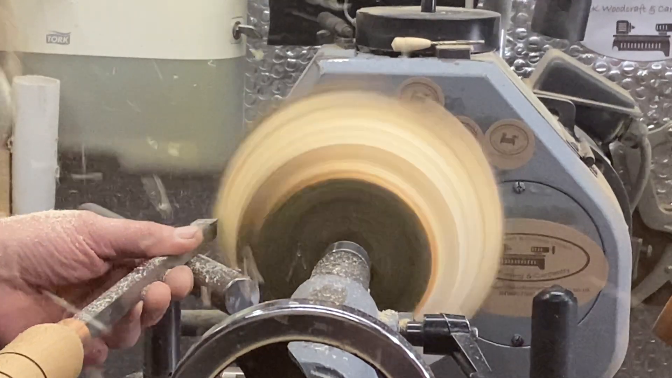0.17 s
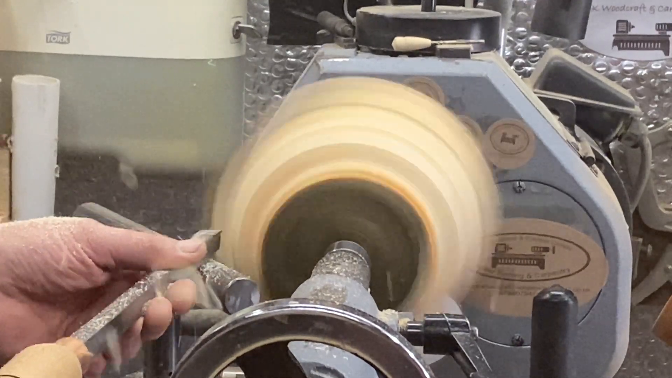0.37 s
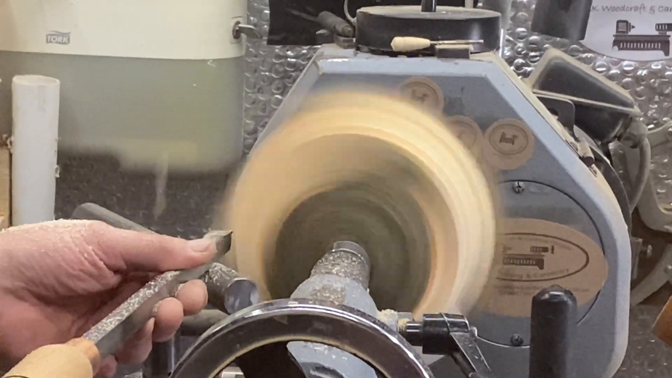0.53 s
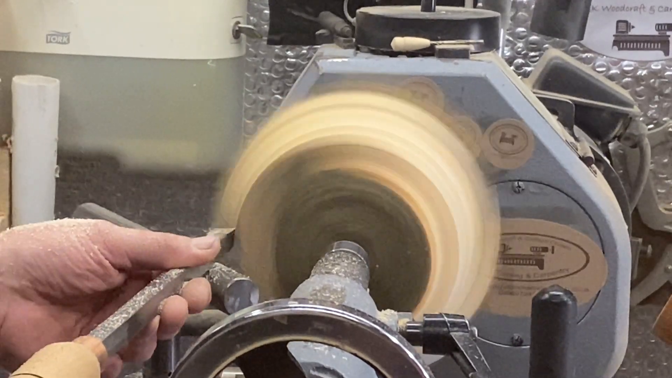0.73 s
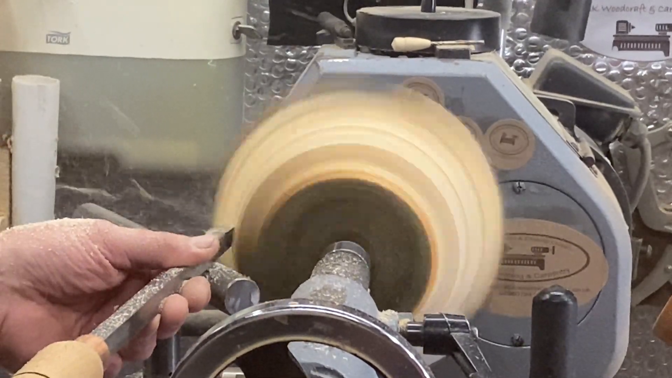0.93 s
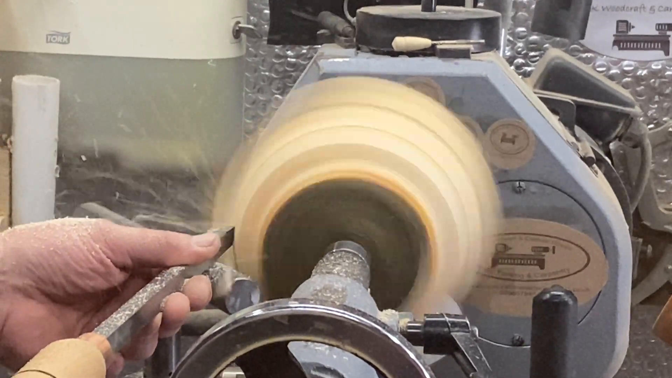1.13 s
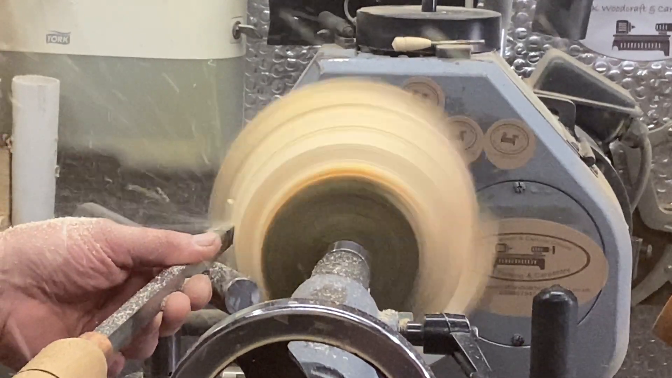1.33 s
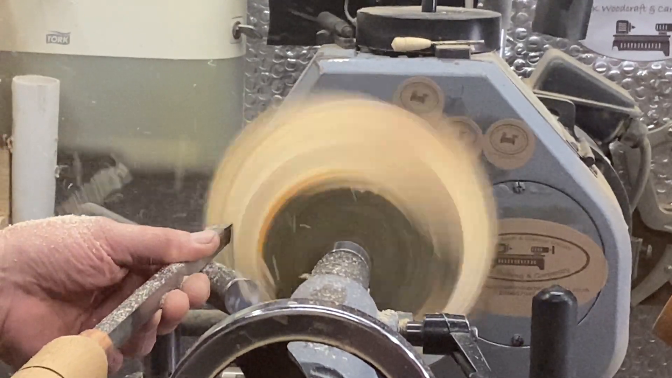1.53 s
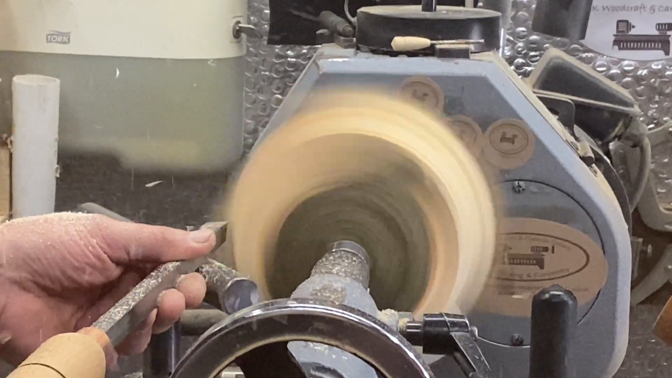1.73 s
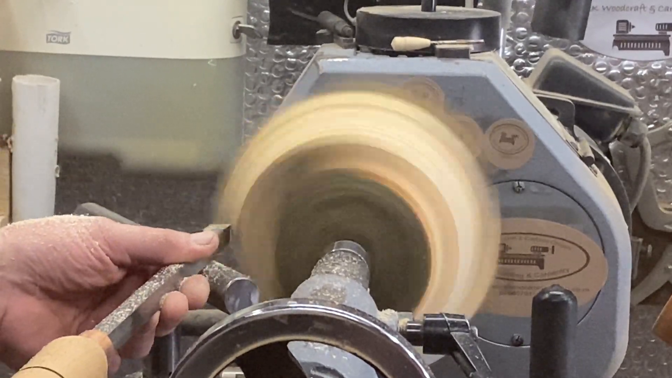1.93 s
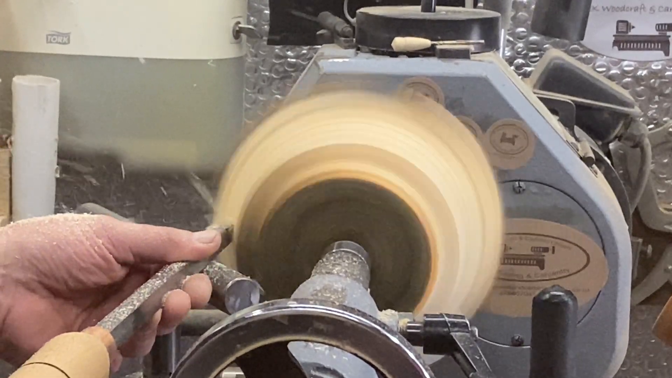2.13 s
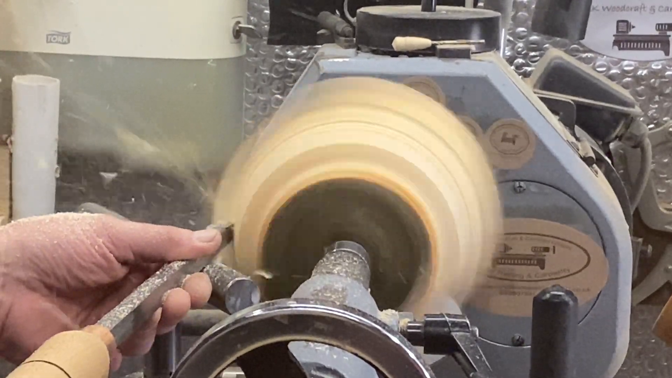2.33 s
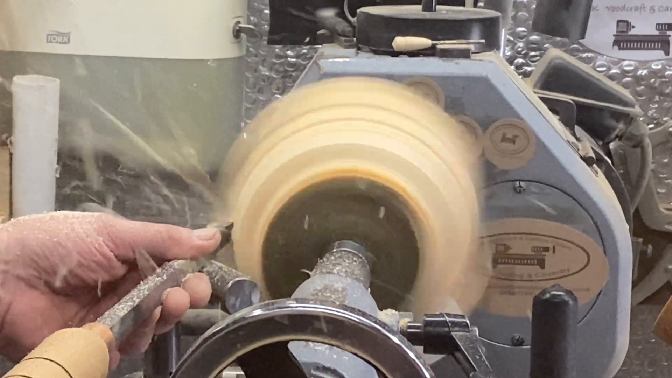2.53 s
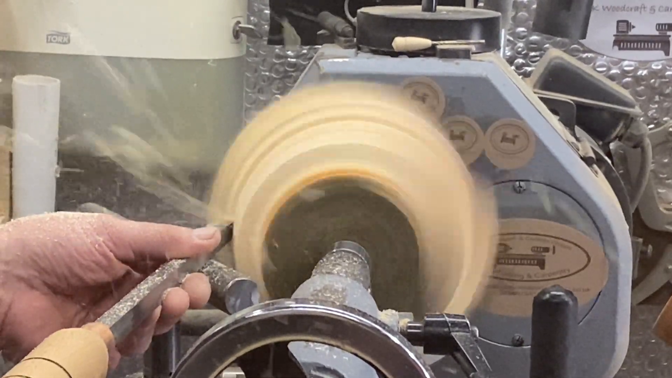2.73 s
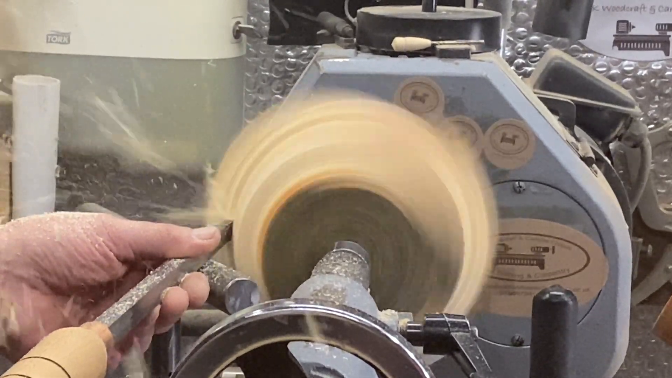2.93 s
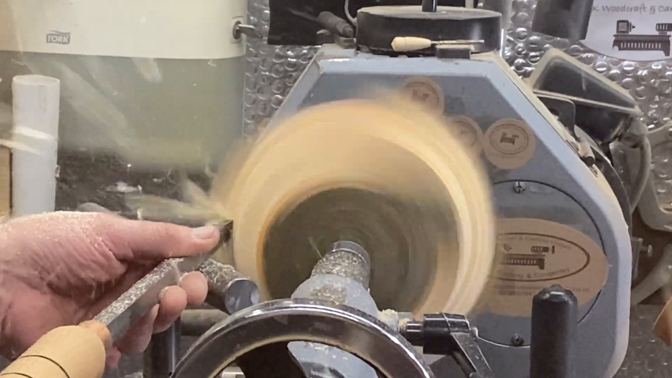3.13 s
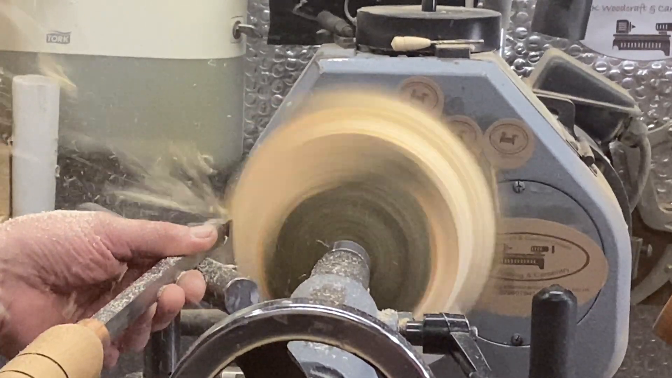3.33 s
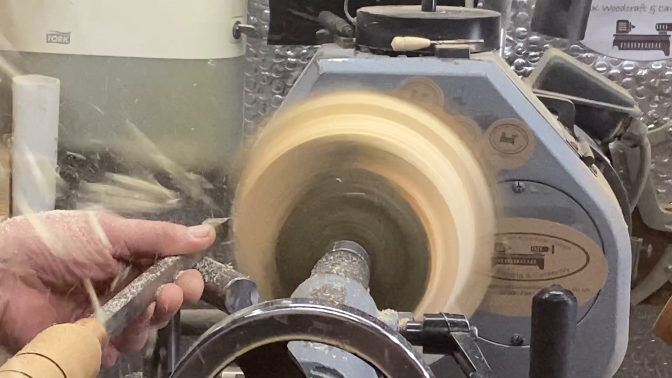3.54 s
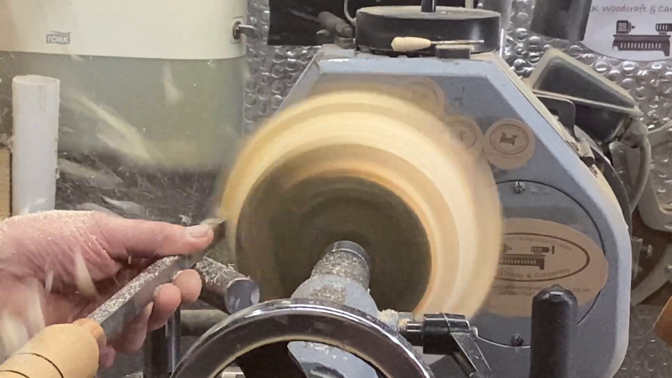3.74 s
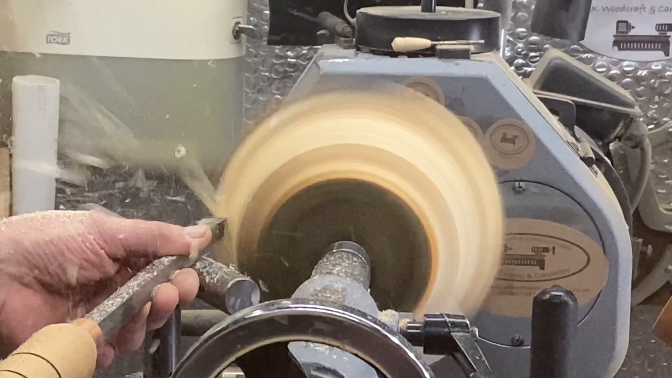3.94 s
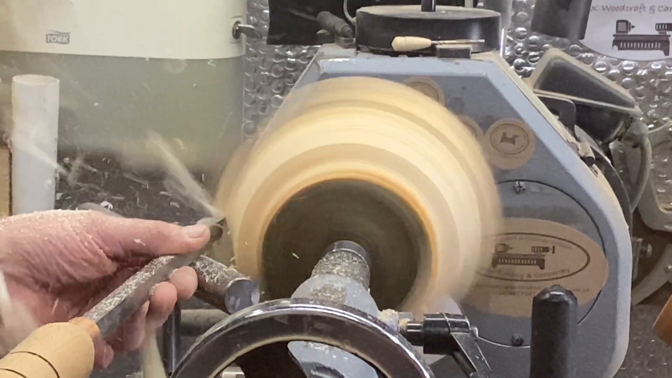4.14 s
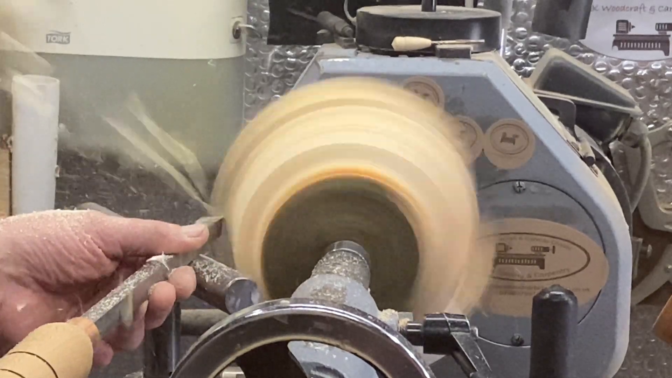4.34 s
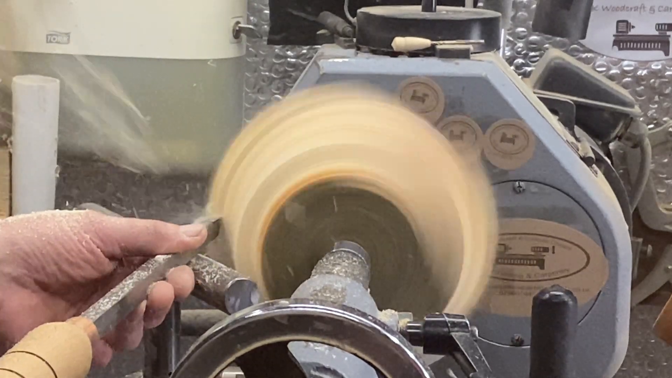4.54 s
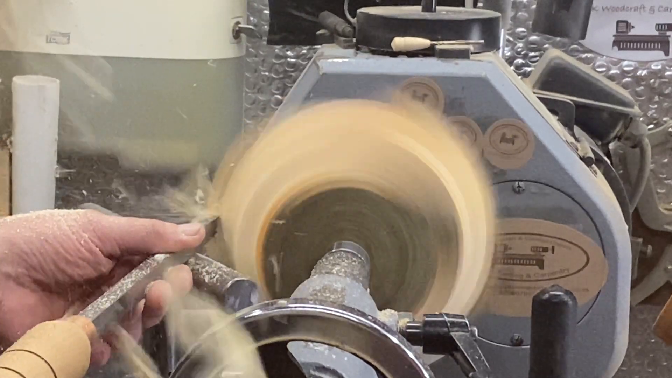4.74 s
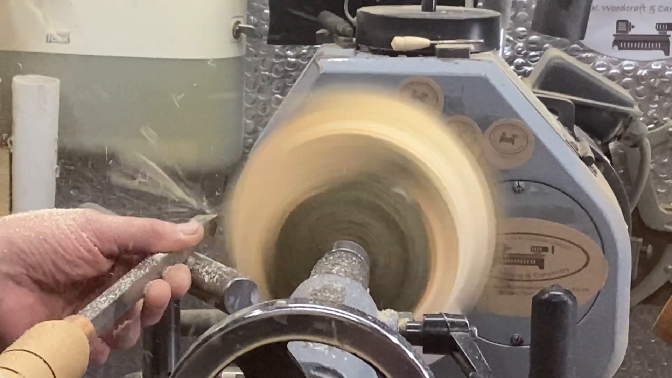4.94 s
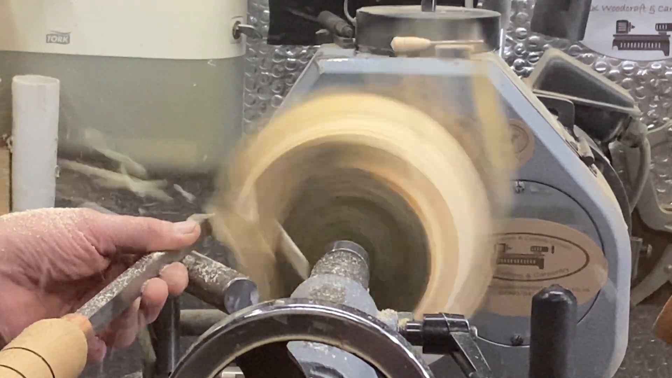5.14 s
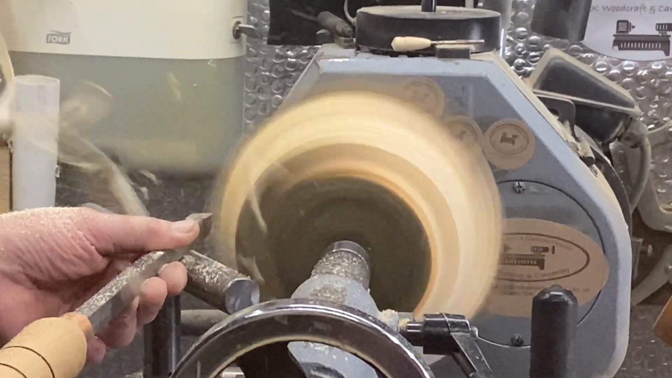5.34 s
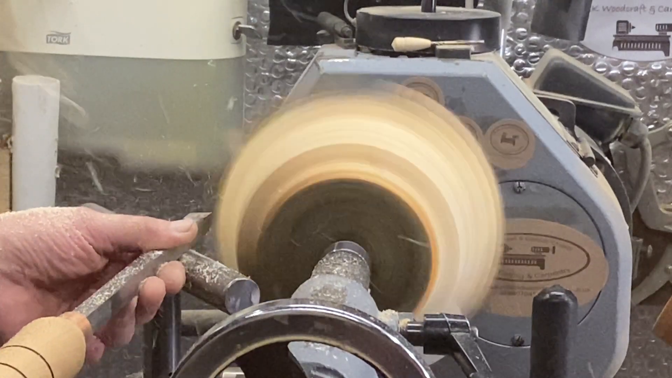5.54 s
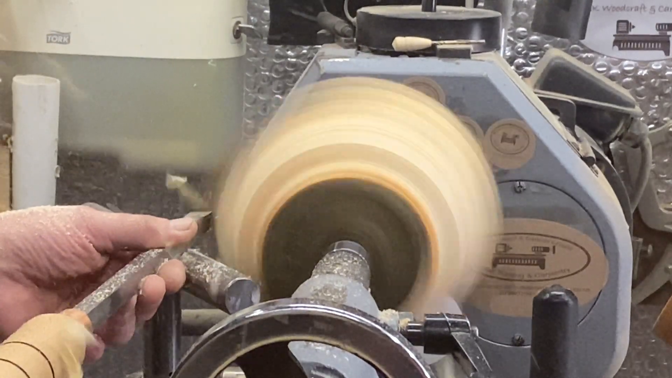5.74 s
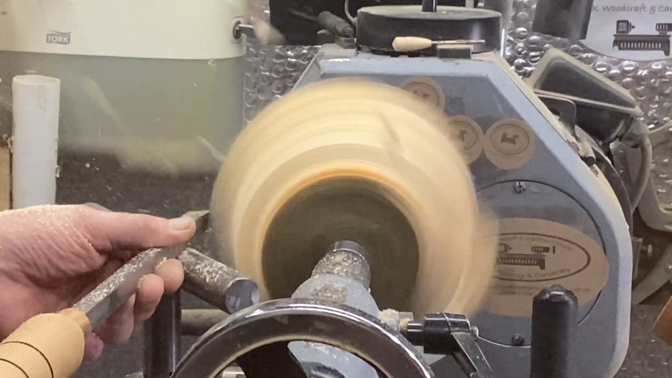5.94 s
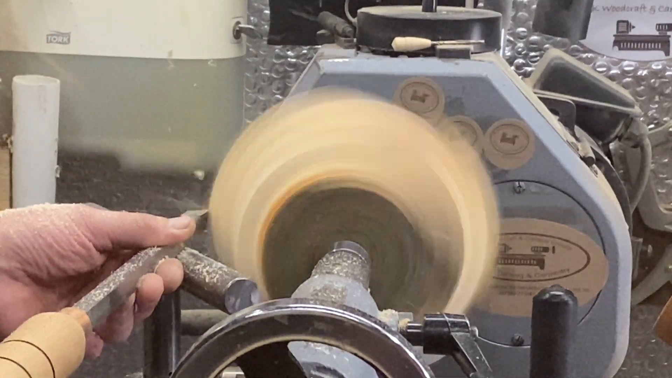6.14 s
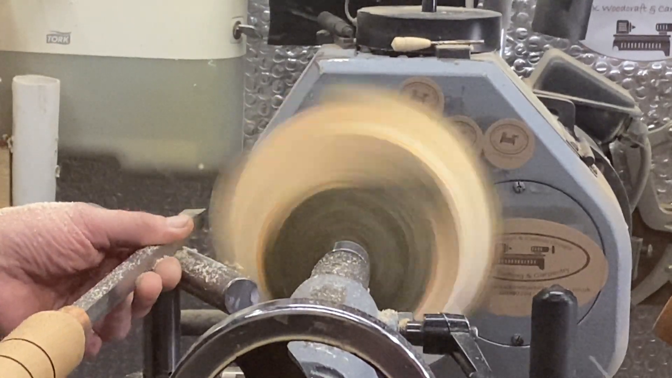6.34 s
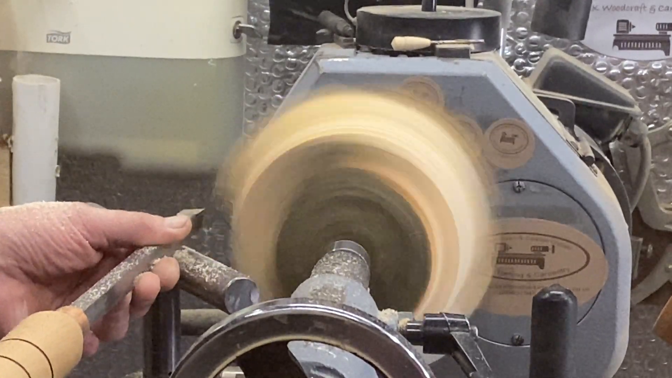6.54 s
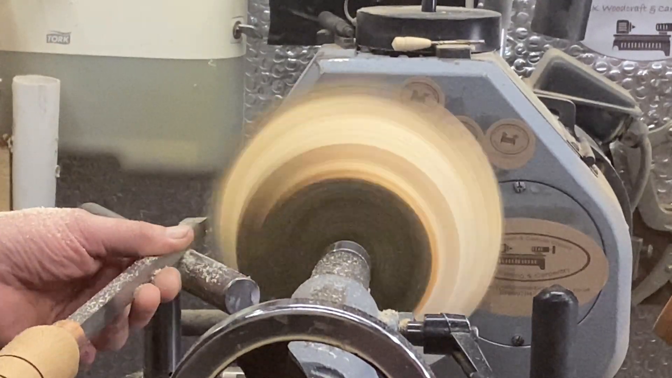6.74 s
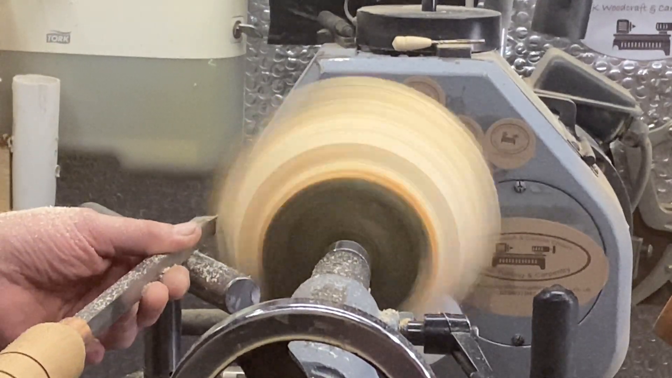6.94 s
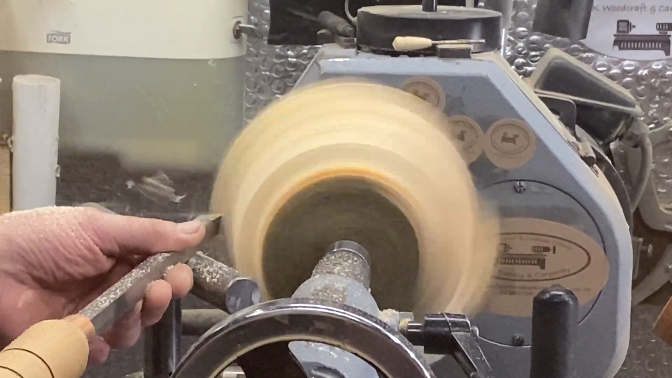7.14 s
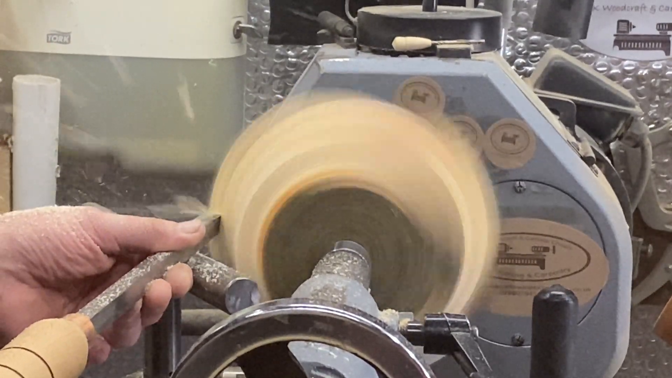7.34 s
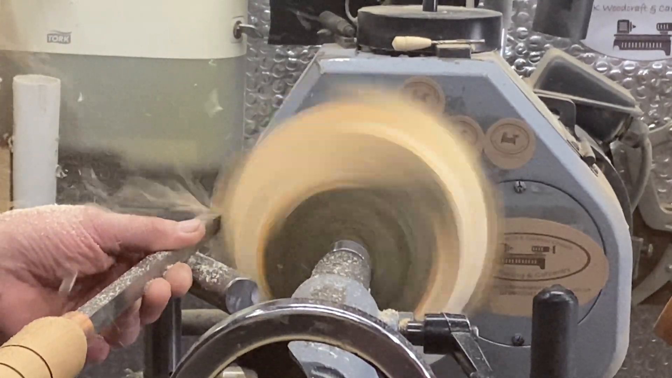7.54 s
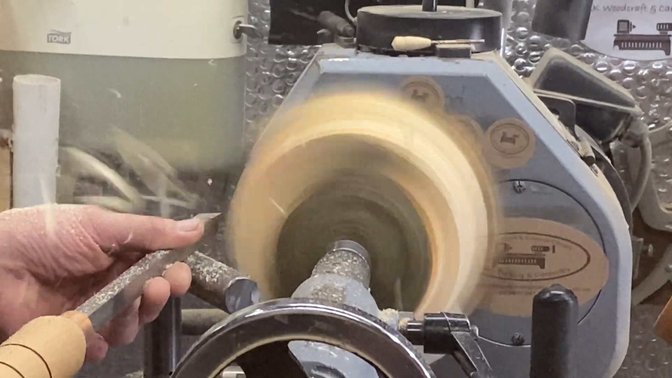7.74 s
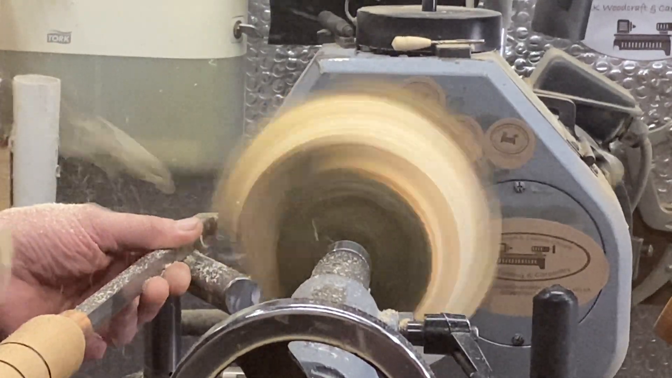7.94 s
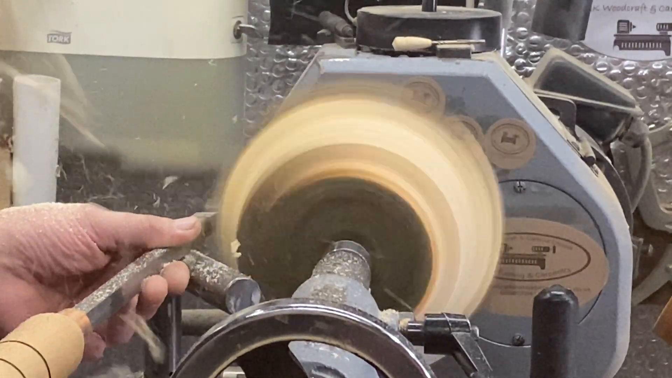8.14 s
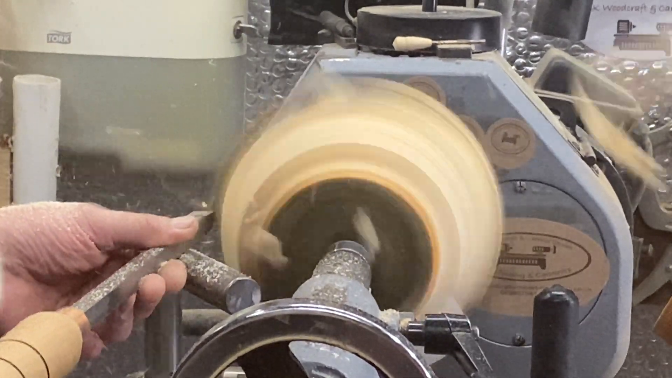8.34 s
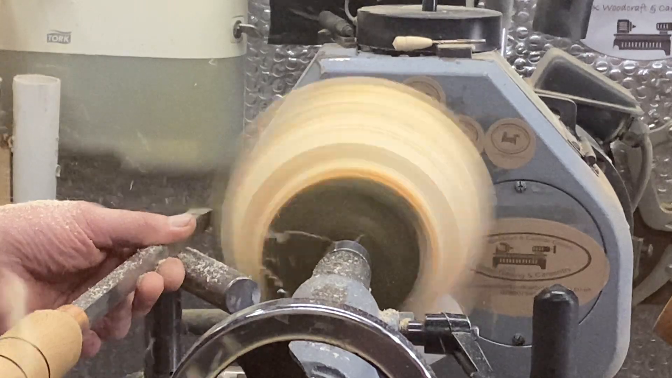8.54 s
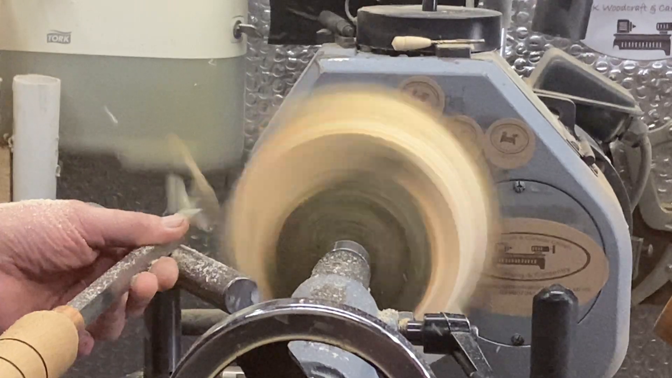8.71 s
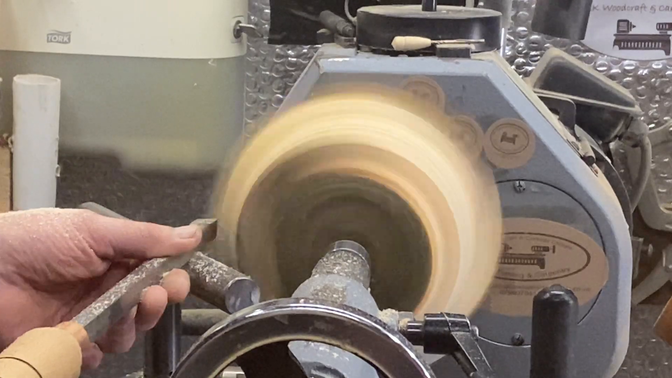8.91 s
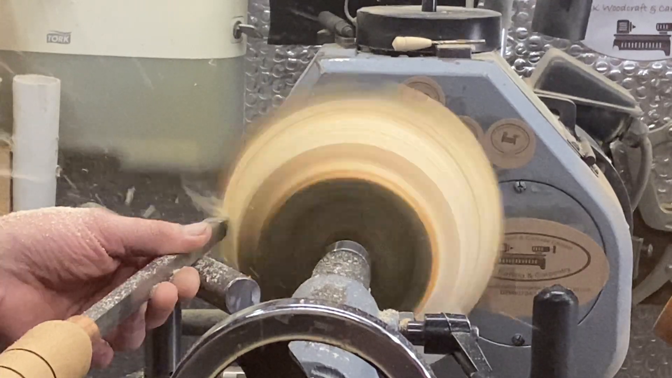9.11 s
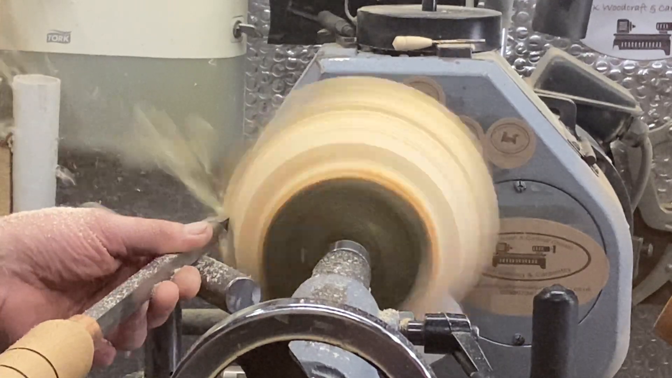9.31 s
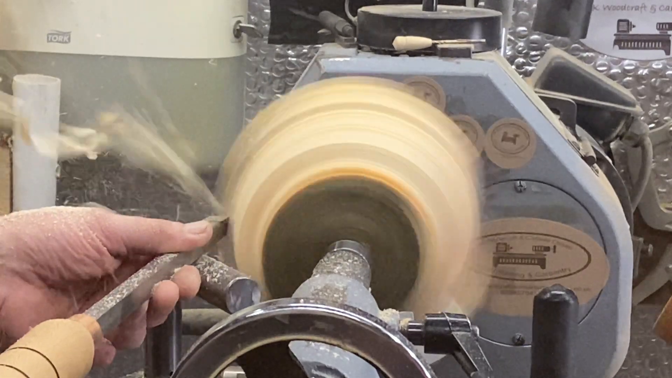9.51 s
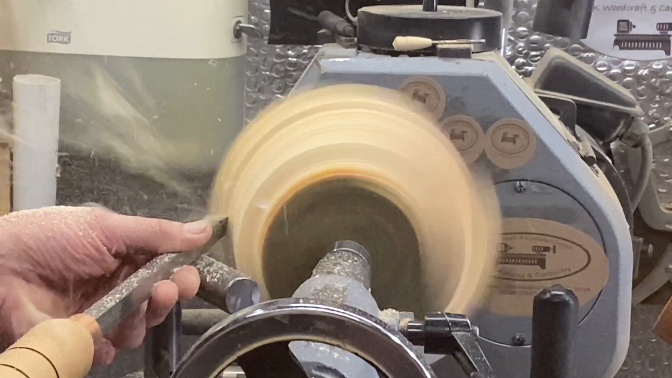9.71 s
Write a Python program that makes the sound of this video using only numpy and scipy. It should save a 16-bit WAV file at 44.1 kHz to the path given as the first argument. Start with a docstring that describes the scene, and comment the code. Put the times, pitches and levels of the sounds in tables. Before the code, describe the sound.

A lathe idles throughout with low hum, airy whir and a soft knock on each turn, about 21 a second. A loud burst of scraping ends by 0.15 s, leaving the machine and one faint graze near 0.56. From 0.7 to 1.7 a softer, stuttering scrape swells in pushes; after a short gap, a long pass runs from 2.0 to 5.8, gritty and ringing, about five pushes a second. Splinters crack from 3.7, and hiss and low boom grow toward 5.5. After a tiny break, cutting continues to 6.45, leaving a thin high steel ring. In the pause, a dull thump at 6.8 and quick, strengthening ticks lead into cutting at 7.1, strongest around 8.3. It stops at 8.65, then resumes from 9.0 nearly to the end at about 10 s. Close stereo, short dry workshop reverberation.

```python
"""A carbide tool roughs an uneven wood blank on a lathe, in passes with short pauses, in a small workshop.
From the start the idling machine hums and knocks, and the blank turns about 21 times a second:
its ridges meet the edge at the same angles turn after turn, and snapping fibres ring tool, blank and bed.
In the first pause a ridge grazes the edge; from 3.7 s splinters crack, and toward the rim the hiss grows.
From 6.2 s the bar sings after bounces; a nudge thumps at 6.8 s, more grazes follow, and cutting resumes."""
import sys
import numpy as np
from scipy import signal
from scipy.fft import rfft, irfft
from scipy.io import wavfile
from scipy.ndimage import uniform_filter1d

SR = 44100
rng = np.random.default_rng(int(sys.argv[2]) if len(sys.argv) > 2 else 0)


def master(y):
    """Save y as 16-bit WAV."""
    cut = np.clip(np.atleast_2d(y).T, -1, 1)
    pcm = np.round(cut * 32767)  # scale
    wavfile.write(sys.argv[1], SR, pcm.astype(np.int16))


N = 435266
TIME = np.arange(N) / SR
FILTER_HZ = np.fft.rfftfreq(8192, 1 / SR)  # grid on which filters are drawn
SCENE_HZ = np.fft.rfftfreq(N, 1 / SR)  # grid of the whole sound


def amp(db):
    """Decibels to amplitude."""
    return 10 ** (np.asarray(db) / 20)


def unit(x):
    """Scales to rms 1."""
    return x / np.sqrt(np.mean(x ** 2) + 1e-20)


def read(points, hz):
    """Reads a spectrum on a log-frequency axis."""
    f, value = np.transpose(points)
    return np.interp(np.log(hz + 1), np.log(f), value)


def follow(table, column):
    """Reads one column of a curve at every sample."""
    rows = np.array(table)
    return np.interp(TIME, rows[:, 0], rows[:, column])


def band(low_hz, high_hz):
    """Gain of a steep band-pass."""
    low_cut = 1 + (low_hz / (FILTER_HZ + 1)) ** 20
    high_cut = 1 + (FILTER_HZ / high_hz) ** 20
    return 1 / np.sqrt(low_cut * high_cut)


def peaks(modes, steepness=1.217):
    """Gain of a set of resonances, added in power."""
    power = 0
    for hz, width, db in modes:
        detuning = 2 * (FILTER_HZ - hz) / width
        power = power + amp(db) ** 2 / (1 + detuning ** 2) ** steepness
    return np.sqrt(power)


def colour(x, gain):
    """Causal filter of unit energy with the shape of the given gain (minimum phase, by cepstrum)."""
    cepstrum = irfft(np.log(np.maximum(gain / gain.max(), 1e-5)))
    cepstrum[1:len(FILTER_HZ) - 1] *= 2
    cepstrum[len(FILTER_HZ):] = 0
    ring = irfft(np.exp(rfft(cepstrum)))
    return signal.oaconvolve(x, unit(ring) / np.sqrt(len(ring)))[:N]


def drift(rate_hz):
    """Slow random motion of rms 1."""
    spectrum = rfft(rng.standard_normal(N))
    return unit(irfft(spectrum / (1 + (SCENE_HZ / rate_hz) ** 4), N))


def steady(x, span):
    """Evens out the power over span seconds."""
    return x / np.sqrt(np.abs(uniform_filter1d(x ** 2, int(span * SR))) + 1e-12)


def bursts(events, decay):
    """A short spurt of decaying noise at each event."""
    out, t = np.zeros(N + SR), np.arange(SR // 50) / SR
    for s, db, *_ in events:
        start = int(s * SR)
        out[start:start + len(t)] += amp(db) * np.exp(-t / decay) * rng.standard_normal(len(t))
    return out[:N]


# spindle speed: (time [s], speed [turns/s])
SPINDLE_SPEED = [(0.0, 20.721), (0.6, 20.981), (1.2, 20.685), (1.8, 20.929), (2.9, 20.416), (4.0, 20.659),
                 (5.5, 20.559), (6.3, 20.781), (6.8, 20.978), (7.6, 20.599), (8.4, 20.541), (8.95, 20.959),
                 (9.45, 20.443), (9.87, 20.796)]


def spin():
    """Turns completed by the spindle, its speed added up over time."""
    return np.cumsum(follow(SPINDLE_SPEED, column=1)) / SR


# whirring air and bearings, shape only: (frequency [Hz], density [dB per Hz])
WHIR_SPECTRUM = [(30, -15), (60, 13), (140, -10.5), (270, 4), (420, -4.5), (530, -4.5), (800, 3.5),
                 (1000, -4.5), (2800, -7.5), (5000, -14.5), (16000, -25)]
# steady tones of the idling machine: (frequency [Hz], rms level [dB])
MACHINE_TONES = [(41.4, -53.5), (163, -55.5), (264, -57), (517, -57.5), (1346, -62), (3413, -61),
                 (9959, -62), (10045, -64)]


def machine(turns, knock_angle=0.318, knock_hz=87, knock_decay=0.012, knock_db=-37, whir_db=-47.5, swish=0.1):
    """A soft knock once a turn, whirring air and bearings, motor hum and the whine of the drive."""
    mean_speed = np.mean(np.array(SPINDLE_SPEED)[:, 1])
    since = ((turns - knock_angle) % 1) / mean_speed  # seconds after the knock
    knock = amp(knock_db) * np.sin(2 * np.pi * knock_hz * since) * np.exp(-since / knock_decay)
    whir = unit(colour(rng.standard_normal(N), amp(read(WHIR_SPECTRUM, FILTER_HZ)) * band(28, 17000)))
    whir *= amp(whir_db) * (1 + swish * np.cos(2 * np.pi * (turns - knock_angle)))
    hum = np.zeros(N)
    for hz, db in MACHINE_TONES:
        wobble = min(hz / 200, 1) * drift(rate_hz=16.4)  # phase, radians
        hum += amp(db) * np.sqrt(2) * np.sin(2 * np.pi * hz * TIME + wobble)
    return knock + whir + hum


# the edge is on the wood: (start time [s], end time [s])
CUTTING_PASSES = [(-0.1, 0.13), (0.675, 1.704), (1.99, 5.771), (5.835, 6.452), (7.075, 8.652),
                  (9.022, 9.994)]
# the hand's pushes, about five a second: (time of deepest cut [s], length at half power [s], level [dB])
HAND_PUSHES = [(0.035, 0.14, -20), (0.959, 0.26, -35), (1.164, 0.26, -24), (1.42, 0.12, -24),
               (1.629, 0.088, -36), (2.144, 0.17, -27), (2.338, 0.23, -21), (2.565, 0.19, -20),
               (2.8, 0.17, -22), (3.002, 0.1, -21.5), (3.174, 0.087, -22), (3.388, 0.17, -22.5),
               (3.571, 0.07, -23.5), (3.711, 0.068, -23.5), (3.927, 0.16, -25), (4.095, 0.082, -22),
               (4.262, 0.072, -22.5), (4.455, 0.14, -22.5), (4.658, 0.079, -20), (4.843, 0.15, -22.5),
               (5.047, 0.08, -19), (5.246, 0.16, -20.5), (5.445, 0.076, -18.5), (5.675, 0.13, -19.5),
               (6.007, 0.11, -21.5), (6.199, 0.15, -23.5), (6.407, 0.15, -25.0), (7.22, 0.2, -25),
               (7.358, 0.097, -24.5), (7.565, 0.19, -21.5), (7.787, 0.083, -20.5), (7.964, 0.1, -20),
               (8.163, 0.11, -18.5), (8.35, 0.09, -17.5), (8.546, 0.19, -21), (9.084, 0.11, -22),
               (9.333, 0.11, -22.0), (9.534, 0.08, -21), (9.711, 0.087, -21), (9.849, 0.053, -24.0)]
ENTER_S, LEAVE_S = 0.064, 0.036  # the edge sinks in, and slips out again


def feed():
    """Depth of cut: swelling and easing pushes add in power for as long as the edge is on the wood."""
    contact = np.zeros(N)
    for start, end in CUTTING_PASSES:
        sink_in = np.clip((TIME - start) / ENTER_S, 0, 1)
        contact += sink_in * np.exp(-np.maximum(TIME - end, 0) / LEAVE_S)
    t = TIME[::100]  # a coarse clock is enough for the hand
    power = sum(amp(db) ** 2 * .5 ** ((2 * (t - s) / length) ** 2) for s, length, db in HAND_PUSHES)
    return contact * np.sqrt(np.interp(TIME, t, power)) + 1e-5


# the edge along the blank: (time [s], place [0 where the second pass starts, 1 at the rim])
EDGE_PLACE = [(0.15, 0.16), (0.7, 0), (2.0, 0.36), (3.3, 0.14), (3.7, 0.46), (5.1, 0.65), (5.5, 0.87),
              (5.9, 0.96), (6.5, 0.95), (7.1, .55), (8.0, .67), (8.3, 0.73), (8.65, .85), (9.05, 0.47),
              (9.87, 0.6)]


def edge_place():
    """Where the edge is along the blank."""
    return follow(EDGE_PLACE, column=1)


def past_place(first, full):
    """Rises from 0 to 1 as the edge travels from one place to the other."""
    return np.clip((edge_place() - first) / max(full - first, .01), 0, 1)


# ridges, each along a stretch of the blank: (angle [turns], length [turns], from [place], to [place],
# snap level [dB], push on the shank [dB]); both levels are relative to the even force between ridges
BLANK_RIDGES = [(0.015, 0.25, -0.2, 0.33, 5, -2), (0.022, 0.051, 0.37, 0.9, 9.5, 9),
                (0.163, 0.18, -0.2, 0.56, 8.5, 13), (0.159, 0.07, 0.537, 0.73, 14.5, 19),
                (0.19, 0.14, 0.73, 0.93, 14, 20.5), (0.185, 0.11, 0.983, 1.2, 25.5, 30),
                (0.338, 0.049, 0.823, 0.94, 19, 14), (0.375, 0.2, 0.93, 1.2, 18.5, 18),
                (0.468, 0.2, -0.2, 1.2, 11.5, 15.5), (0.487, 0.04, 0.36, 0.518, 15, 3),
                (0.685, 0.062, -0.2, 0.9, 6.5, 7), (0.77, 0.033, -0.2, 0.38, 13.5, 17)]
TWIST_TURNS = 0.048  # the ridges wind this far round the blank from place 0 to the rim
RIDGE_RISE_TURNS, RIDGE_TAPER = 0.009, 0.084  # steepness of a ridge's face; places over which it runs out


def ridges(turns, column):
    """Cutting force: each ridge under the edge strikes it abruptly, once a turn, and tapers away."""
    place, power = edge_place(), np.ones(N)
    for row in BLANK_RIDGES:
        angle, length, first, last = row[:4]
        present = np.clip(np.minimum(place - first, last - place) / RIDGE_TAPER + .5, 0, 1)
        near = present > 0
        past = (turns[near] - angle - TWIST_TURNS * place[near]) % 1  # turns since the ridge's face
        strike = (1 - np.exp(-past / RIDGE_RISE_TURNS)) * np.exp(-past / length)
        power[near] += present[near] * (amp(row[column]) * strike) ** 2
    return np.sqrt(power)


def surface(turns, memory, spread_db, density, size=2140):
    """Fibres snapping round the blank; each turn meets partly the same fibres as the last."""
    shape = (int(turns[-1]) + 1, size)  # one row of fibres a turn
    fresh = rng.standard_normal(shape)
    fibres = signal.lfilter([np.sqrt(1 - memory ** 2)], [1, -memory], fresh, axis=0)
    sizes = amp(spread_db * np.minimum(rng.exponential(1, N), 4))
    snaps = sizes * (rng.random(N) < density)
    return unit(fibres.ravel()[(turns * size).astype(int)] * snaps)


def chips(per_s, decay, size_db):
    """Each chip breaks away abruptly and tears on for a few milliseconds, over steady rubbing."""
    sizes = amp(size_db * np.minimum(rng.exponential(1, N), 3))
    starts = sizes * (rng.random(N) < per_s / SR)
    return 1.43 + signal.lfilter([1], [1, -np.exp(-1 / (decay * SR))], starts)


# resonances of the lathe bed: (frequency [Hz], width [Hz], relative level [dB])
BED_MODES = [(121.4, 13.3, 0)]


def ring_bed(grain):
    """The heavy bed booms to the coarse grain."""
    return steady(colour(grain, peaks(BED_MODES) * band(86, 184)), span=0.11)


# resonances of the wood blank: (frequency [Hz], width [Hz], relative level [dB])
BLANK_MODES = [(197.4, 39, 0.5), (266, 47, 1), (328.5, 52, -4), (494, 160, -9.5), (566, 51, 2),
               (668, 17, -3.5), (781, 66, 3)]


def ring_blank(grain, snap):
    """The blank rings to the coarse grain, with the strikes of the ridges softened."""
    return steady(colour(grain * snap ** 0.47, peaks(BLANK_MODES) * band(197, 1070)), span=0.115)


# resonances of the tool's shank: (frequency [Hz], width [Hz], relative level [dB])
SHANK_MODES = [(1005, 39, -14.5), (1159, 44, -2.5), (1223.5, 56, 0.5), (1400, 113, -8.5),
               (1603, 250, -10.5)]


def ring_shank(fibres, push, breaks):
    """The shank rings as ridges push it, fibre by fibre, and a little with each chip."""
    return steady(colour(fibres * push * breaks ** 0.39, peaks(SHANK_MODES) * band(760, 1700)), span=0.119)


WANDER_DB, WANDER_HZ, WANDER_SPLIT_HZ = 1, 7.1, 2400  # rms tilt, its rate, and where the rings divide


def wander(x):
    """Tips the weight of the scrape now toward its lower, now toward its upper resonances."""
    low = irfft(rfft(x) / (1 + (SCENE_HZ / WANDER_SPLIT_HZ) ** 16), N)
    tip = amp(WANDER_DB * drift(rate_hz=WANDER_HZ))
    return low / tip + (x - low) * tip


# resonances of the cutting edge: (frequency [Hz], width [Hz], relative level [dB])
EDGE_MODES = [(1941, 45, 3), (2046, 140, 1.5), (2233, 89, -3.5), (2433, 70, -6), (2630, 300, -5.5),
              (2866, 78, 0), (3010, 89, -2), (3110, 410, -7.5), (3470, 24, -6), (4012, 174, -7.5)]


def ring_edge(fibres, snap, breaks):
    """The light edge rings to every fibre, ridge and chip."""
    scrape = colour(fibres * snap * breaks, peaks(EDGE_MODES) * band(1820, 5450))
    return amp(-1.3) * steady(wander(scrape), span=0.075)


# hiss of the chips leaving the edge, shape only: (frequency [Hz], relative density [dB per Hz])
SPRAY_SPECTRUM = [(4300, 6.5), (5200, 5.5), (6100, 0), (7300, 2), (9600, 1), (14000, 0.5), (15000, 0.5),
                  (16000, 1)]
SPRAY_DB, SPRAY_RIM_DB, RIM_FROM = -9.5, 7, 0.7  # level, rise at the rim, place where the rise begins


def spray_chips(dust, snap, crumbs):
    """Small chips hiss off the edge, louder over the last stretch before the rim."""
    spectrum = amp(read(SPRAY_SPECTRUM, FILTER_HZ)) * band(4180, 18000)
    hiss = steady(colour(dust * snap * crumbs ** 0.68, spectrum), span=0.195)
    return amp(SPRAY_DB + SPRAY_RIM_DB * past_place(RIM_FROM, 1)) * hiss


HEAVY_DECAY_S, HEAVY_TAIL_DB = 0.031, -4  # blank and bed shake on after the edge lets go


def ring_out(level):
    """The shaking that heavy parts keep: it follows the level and dies away slowly."""
    keep = np.exp(-1 / (HEAVY_DECAY_S * SR))
    return amp(HEAVY_TAIL_DB) * signal.lfilter([1 - keep], [1, -keep], level)


# relative level of the lower resonances: (time [s], bed level [dB], blank level [dB], shank level [dB])
PART_LEVELS = [(0.05, -27, -11, -6), (1.0, -36, -7, -2.5), (1.5, -26, -6.5, -5.5), (2.15, -33, -9.5, -4),
               (3.37, -25.5, -6, -1), (3.9, -21, -10.5, -4.5), (4.7, -15.5, -9.5, -6),
               (5.1, -20.5, -7.5, -7.5), (6.0, -17.5, -4, -7), (6.45, -10, -0.5, -5), (7.1, -24, -12.5, -7),
               (7.35, -19, -10, -8.5), (7.87, -13.5, -5, -7), (8.5, -22.5, -9.5, -3.5),
               (9.12, -23, -8, -2.5), (9.87, -20, -12, -2.5)]


def cutting(turns):
    """The broken cut drives bed, blank, shank and edge, and throws a spray of chips."""
    bite = feed()
    bed_gain, blank_gain, shank_gain = (amp(follow(PART_LEVELS, column=k)) for k in (1, 2, 3))
    # heavy parts even out quick changes of bite
    inertia = np.clip(uniform_filter1d(bite, SR // 4) / bite, .25, 2) ** 0.5
    snap, push = ridges(turns, column=4), ridges(turns, column=5)
    fibres = surface(turns, memory=0.72, spread_db=2.07, density=.3)
    grain = surface(turns, memory=0.844, spread_db=1, density=0.94)
    dust = surface(turns, memory=0.14, spread_db=-3.5, density=.6)
    breaks = chips(per_s=170, decay=0.0034, size_db=0.5)
    crumbs = chips(per_s=360, decay=0.0048, size_db=-3.0)  # small ones only hiss
    heavy = inertia * (bed_gain * ring_bed(grain)) + blank_gain * ring_blank(grain, snap)
    light = shank_gain * ring_shank(fibres, push, breaks) + ring_edge(fibres, snap, breaks)
    light += spray_chips(dust, snap, crumbs)
    return np.maximum(bite, ring_out(bite)) * heavy + bite * light


# resonances driven harder along one stretch of the blank:
# (place [as in EDGE_PLACE], reach [places], frequency [Hz], width [Hz], boost [dB])
DRIVEN_SPOTS = [(0.05, 0.25, 235, 52, 3), (0.6, 0.1, 199, 32, 3.5), (0.574, 0.082, 2190, 400, 3.5),
                (0.51, 0.061, 800, 110, 3.5)]


def sweet_spots(x):
    """Some resonances swell as the edge passes the place that drives them best."""
    place, spectrum, out = edge_place(), rfft(x), x
    for best, reach, hz, width, db in DRIVEN_SPOTS:
        resonance = irfft(spectrum / (1 + 2j * (SCENE_HZ - hz) / width), N)
        out = out + (amp(db) - 1) * np.exp(-((place - best) / reach) ** 2) * resonance
    return out


# workshop reverberation: (frequency [Hz], level against the direct sound [dB])
ROOM_SPECTRUM = [(100, -20), (600, -6.5), (1400, -3.5), (2500, -13), (5000, -30), (16000, -29)]


def workshop(x, t60=0.061, delay=0.0097):
    """A short diffuse tail of decaying noise, different at each ear."""
    t = TIME[:SR // 2]
    tails = rng.standard_normal((2, len(t))) * np.exp(-np.log(1000) * t / t60) * (t > delay)
    tails /= np.linalg.norm(tails, axis=1, keepdims=True)
    tails = irfft(rfft(tails) * amp(read(ROOM_SPECTRUM, np.fft.rfftfreq(len(t), 1 / SR))))
    return signal.oaconvolve(x[None], tails, axes=1)[:, :N]


def tick(blows):
    """A blow rings the edge's resonances, with a bright tick on top."""
    return colour(blows, peaks(EDGE_MODES) * band(1100, 7200) + amp(-23.0) * band(3220, 22000))


# the highest ridge just brushes the waiting edge: (time [s], relative level [dB])
RIDGE_GRAZES = [(0.5644, -53), (6.8134, -34), (6.8644, -41), (6.9117, -36), (6.9591, -28), (7.007, -25),
                (7.0549, -22)]


def grazes():
    """Light brushes in the pauses: millisecond spurts of noise tick the edge."""
    return tick(amp(-7.5) * bursts(RIDGE_GRAZES, decay=0.0038))


# splinters torn out, each ringing one resonance most: (time [s], relative level [dB], ring [Hz])
TORN_SPLINTERS = [(3.693, -3, 1980), (3.7439, -1.5, 4050), (3.8397, 2, 2910), (3.8881, -6, 4080),
                  (3.9365, -1, 2020), (4.0816, -5, 1990), (4.406, -8, 1890), (4.8906, -9, 2250),
                  (4.9883, -0.5, 2230), (5.0365, 2.5, 2760), (5.203, 2, 2880), (5.5802, -3, 2920),
                  (5.7213, -4.5, 2980), (6.1542, -2, 2470), (6.2018, -2, 2860), (6.4433, -10, 2980),
                  (7.3986, -6, 2180), (7.7383, -3, 1937), (8.4698, -6, 3010), (8.5195, 2, 3010),
                  (8.6158, -1, 2045), (9.5307, -8, 1940), (9.6749, -4.5, 1905)]


def splinters(ring_db=-12, ring_decay=0.0073):
    """Single cracks: a noisy tick of the edge and one decaying sine."""
    rings, t = np.zeros(N + SR), TIME[:SR // 20]
    for s, db, hz in TORN_SPLINTERS:
        start = int(s * SR)
        rings[start:start + len(t)] += amp(db + ring_db) * np.sin(2 * np.pi * hz * t) * np.exp(-t / ring_decay)
    return rings[:N] + tick(amp(-13.0) * bursts(TORN_SPLINTERS, decay=0.0031))


# change of colour when cutting at the rim: (frequency [Hz], gain [dB])
RIM_TONE = [(400, 1.5), (570, 0), (780, -8.5), (1200, -1.5), (1850, -4), (2850, 3.5), (4000, -1.5)]
COLOUR_FROM, COLOUR_FULL = 0.47, 1  # places between which the colour of the rim takes over


def near_rim(x):
    """The point of contact decides which resonances are driven hardest: fades to the rim's colour."""
    at_rim = irfft(rfft(x) * amp(read(RIM_TONE, SCENE_HZ)), N)
    return x + past_place(COLOUR_FROM, COLOUR_FULL) * (at_rim - x)


# the steel bar is left singing when it bounces off the wood: (time [s], level [dB])
BAR_BOUNCES = [(6.202, -52), (6.443, -42), (8.616, -47)]


def steel(ring_hz=11009, t60=0.98):
    """A thin high ring of the steel bar after a bounce: one slowly dying sine."""
    out, t = np.zeros(N + SR), TIME[:SR]
    ring = np.sin(2 * np.pi * ring_hz * t) * np.exp(-np.log(1000) * t / t60)
    for s, db in BAR_BOUNCES:
        start = int(s * SR)
        out[start:start + SR] += amp(db) * ring
    return out[:N]


def bump(s=6.816, hz=255, decay=0.025, db=-34):
    """The tool is nudged along its rest during a pause: a short damped sine."""
    t = np.maximum(TIME - s, 0)
    return amp(db) * np.sin(2 * np.pi * hz * t) * np.exp(-t / decay)


def scene():
    """Mixes machine, cut and single events, a touch louder on the left, and adds the workshop."""
    turns = spin()
    cut = sweet_spots(near_rim(cutting(turns)))
    direct = machine(turns) + cut + grazes() + splinters() + steel() + bump()
    return direct * amp([[.2], [-.2]]) + workshop(direct)


# lead of the left microphone port over the right: (frequency [Hz], phase [radians])
PORT_LEAD = [(1000, 0), (1280, .6), (1900, .05), (7400, 0), (8300, -1.9), (9000, -3.14), (11000, -6.2),
             (13300, -9.4), (15100, -12.5)]
CUTOFF_HZ = 15850


def record(dry):
    """Two microphone ports drift apart in phase in the treble; bass cut, rounded peaks, band limit."""
    lead = read(PORT_LEAD, SCENE_HZ)
    pair = irfft(rfft(dry) * np.exp(.5j * np.array([lead, -lead])), N)
    pair = signal.sosfilt(signal.butter(6, 34, "highpass", fs=SR, output="sos"), pair)
    pair = pair / (1 + (pair / .88) ** 6) ** (1 / 6)  # peaks level off at 0.88
    low_pass = signal.firwin(511, CUTOFF_HZ, window=("kaiser", 9), fs=SR)
    return signal.oaconvolve(pair, low_pass[None], "same")


dry = scene()
out = record(dry)
master(out)
```